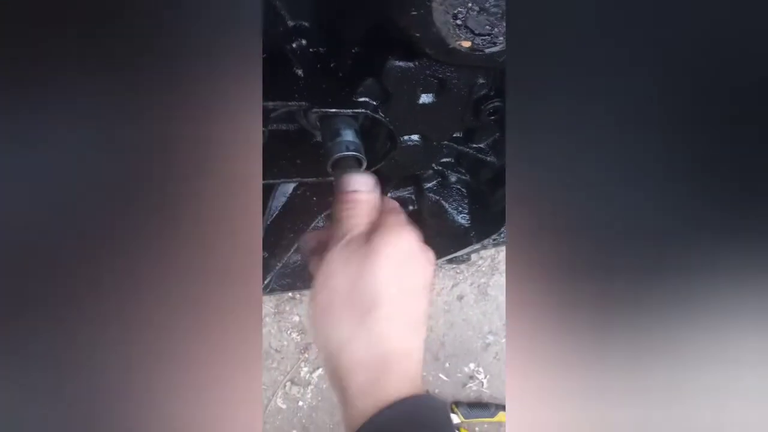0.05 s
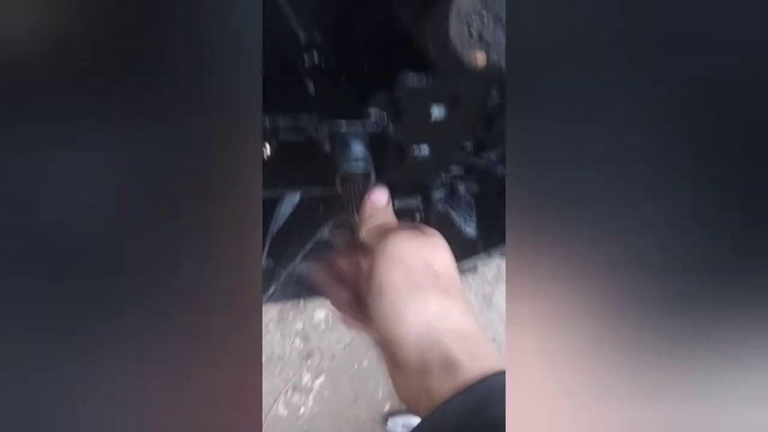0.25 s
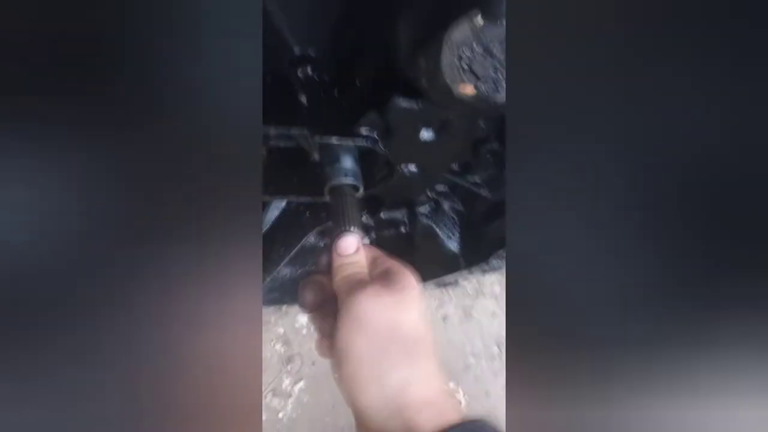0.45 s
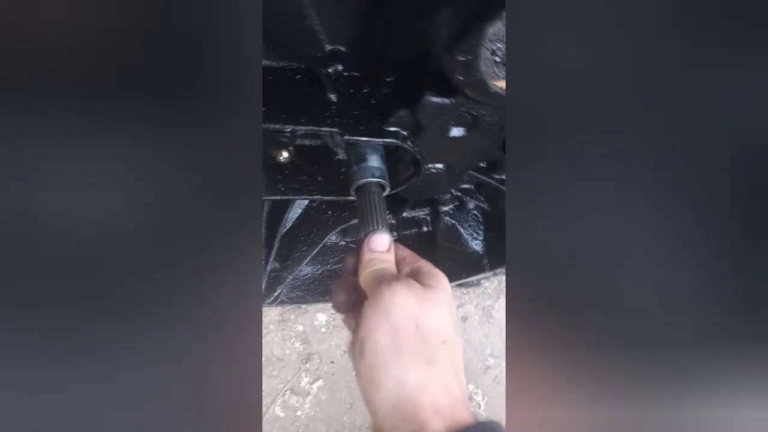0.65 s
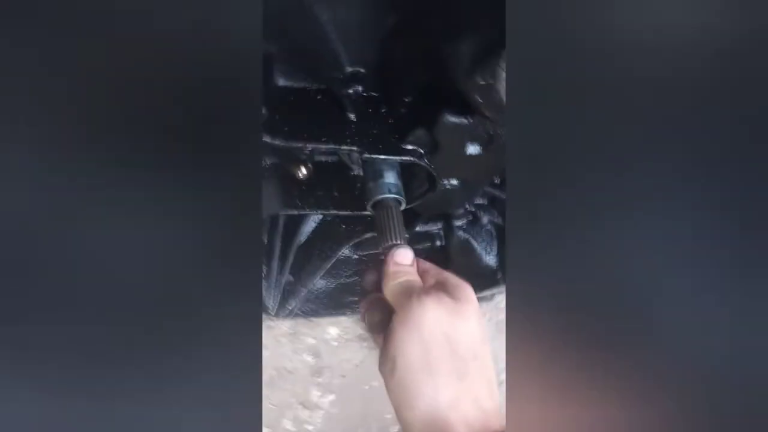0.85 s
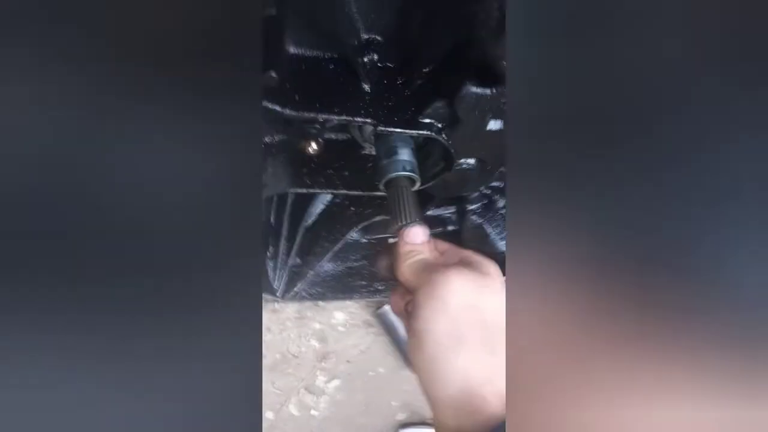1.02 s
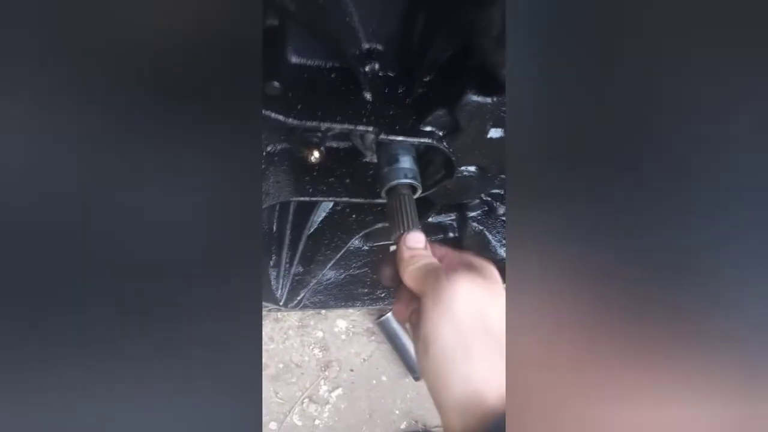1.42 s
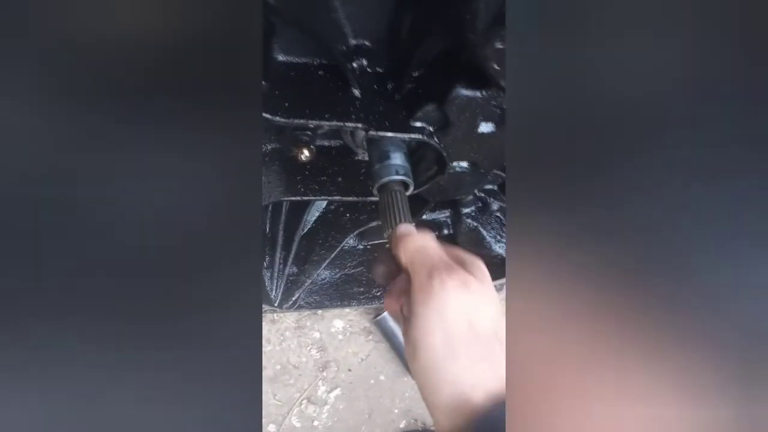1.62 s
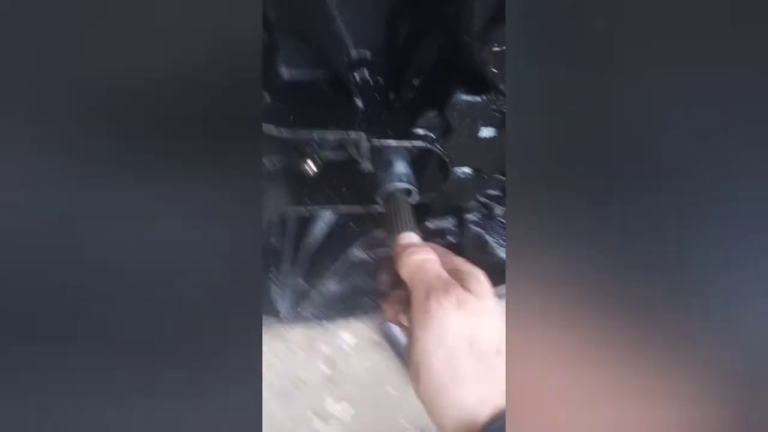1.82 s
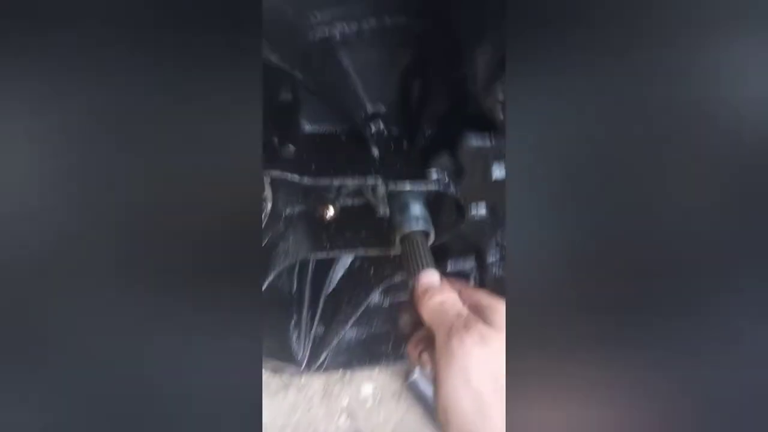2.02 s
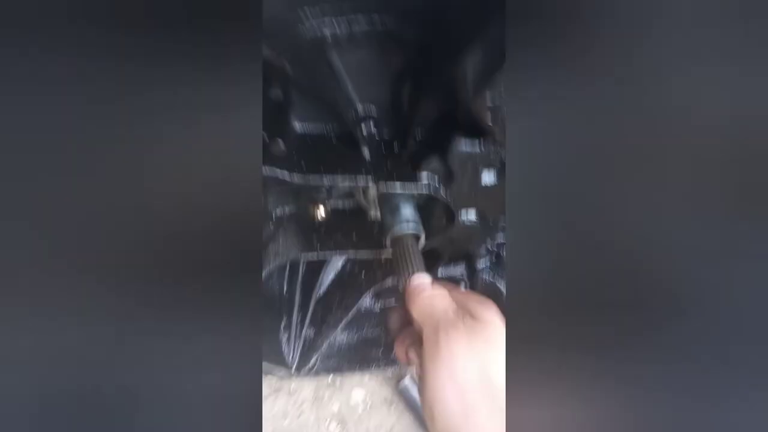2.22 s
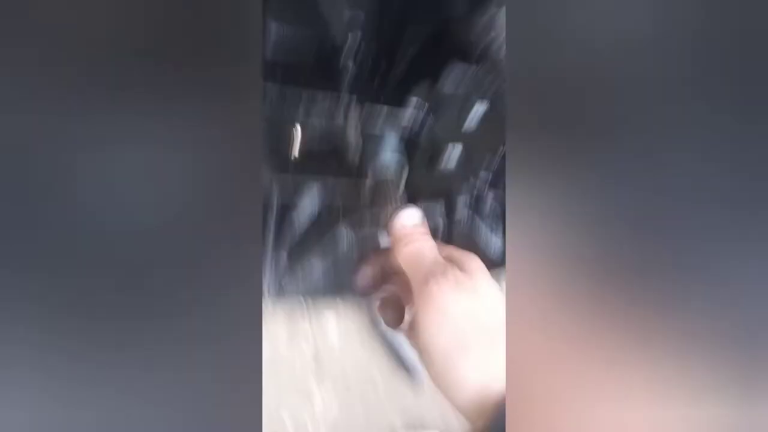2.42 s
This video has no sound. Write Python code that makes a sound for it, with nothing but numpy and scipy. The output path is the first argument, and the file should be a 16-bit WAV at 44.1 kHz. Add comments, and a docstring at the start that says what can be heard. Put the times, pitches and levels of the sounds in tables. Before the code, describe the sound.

A loose steel shaft rocked by hand, clunking and clicking repeatedly in its gearbox housing.

```python
"""A garage, up close: a hand rocks a loose steel shaft in its gearbox housing.
Each swing takes up the play with a light tap or two, touches, and lands a few ms later with a dull
clunk that rings the casting. The splines chatter with bright clicks that ring the shaft.
Underneath sit a low rumble, a faint hiss, the dull rub of the hand and a short room tail."""
import sys
import numpy as np
from scipy import signal
from scipy.fft import rfft, irfft
from scipy.io import wavfile

SR = 44100
rng = np.random.default_rng(int(sys.argv[2]) if len(sys.argv) > 2 else 0)


def log_audio(samples):
    """Write samples as a 16-bit WAV file to the path given in sys.argv[1]."""
    # one column per channel
    frames = np.atleast_2d(samples).T
    # limit to full scale, then quantise
    limited = np.clip(frames, -1, 1)
    pcm = np.round(limited * 32767).astype(np.int16)
    wavfile.write(sys.argv[1], SR, pcm)


N = 112454
HIT_SIZE = 6144  # samples in one hit
HIT_T, HIT_HZ = np.arange(HIT_SIZE) / SR, np.fft.rfftfreq(HIT_SIZE, 1 / SR)
RING_RISE_S = 0.0014
RING_ATTACK = 1 - np.exp(-HIT_T / RING_RISE_S)
TAP_DB, REBOUND_DB, CLICK_DB, CLUNK_DB = -3.5, -1.5, -8.5, -3.5  # faders, added to each hit's level


def amp(db):
    """Decibels to gain."""
    return 10 ** (np.asarray(db) / 20)


def unit(x):
    """Scales to energy 1."""
    return x / np.sqrt(np.sum(x ** 2) + 1e-20)


def read(points, hz):
    """Reads a curve on a log-frequency axis."""
    f, value = np.transpose(points)
    return np.interp(np.log(hz + 1), np.log(f), value)


def fader(curve):
    """A gain that rides a curve of seconds and dB."""
    return amp(np.interp(np.arange(N) / SR, *np.transpose(curve)))


def add(mix, s, sound):
    """Mixes a sound in at s seconds."""
    part = mix[max(round(s * SR), 0):][:len(sound)]
    part += sound[:len(part)]


def colour(x, db):
    """Minimum-phase EQ with a gain in dB for each bin of x."""
    cepstrum = irfft(np.log(amp(db)))
    cepstrum[1:len(x) // 2] *= 2
    cepstrum[len(x) // 2 + 1:] = 0
    return irfft(rfft(x) * np.exp(rfft(cepstrum)))


def shelves(hit, bass_db, treble_db, bass_hz=516, treble_hz=2450):
    """Bass and treble shelves for one hit."""
    bass = 1 / (1 + (HIT_HZ / bass_hz) ** 4)
    treble = 1 - 1 / (1 + (HIT_HZ / treble_hz) ** 4)
    return colour(hit, bass_db * bass + treble_db * treble)


def noise(eq):
    """Steady noise of rms 1, shaped by an EQ curve."""
    gain = amp(read(eq, np.fft.rfftfreq(N, 1 / SR)))
    return np.sqrt(N) * unit(irfft(rfft(rng.standard_normal(N)) * gain, N))


def dying_noise(t60, size):
    """Flat noise whose bands die away at their own speeds."""
    flat = irfft(np.exp(2j * np.pi * rng.random(size // 2 + 1)))
    hz, t, bands = signal.stft(flat, SR, nperseg=128)
    decay = amp(-60 * t / read(t60, hz)[:, None])
    return signal.istft(bands * decay, SR, nperseg=128)[1][:size]


# The rumble's EQ. Each row: frequency in Hz, gain in dB.
RUMBLE_EQ = [(20, -21.5), (50, -10), (68, -9), (95, 3), (150, 1.5), (210, -14), (400, -30), (16000, -65.5)]
# Its fader ride. Each row: time in seconds, level in dB.
RUMBLE_RIDE = [(0, -57.5), (1.35, -54), (1.6, -63), (2.23, -53), (2.36, -57), (2.55, -66.5)]

def rumble(hum_hz=95.7, hum_db=-15):
    """A low bed with a wavering hum inside it."""
    waver = noise([(3, 0), (12, -40), (40, -120)])
    hum = np.sqrt(2) * waver * np.sin(2 * np.pi * hum_hz * np.arange(N) / SR)
    return fader(RUMBLE_RIDE) * (noise(RUMBLE_EQ) + amp(hum_db) * hum)


# The hiss's EQ. Each row: frequency in Hz, gain in dB.
HISS_EQ = [(2500, -8), (6300, 13), (8200, -5), (10300, -2), (13000, -13.5), (15400, -4.5), (16200, -16)]
# Its fader ride. Each row: time in seconds, level in dB.
HISS_RIDE = [(0, -75), (.6, -78), (1.65, -88), (2.25, -71.5), (2.45, -72), (2.55, -79)]

def hiss():
    """Faint air on top."""
    return fader(HISS_RIDE) * noise(HISS_EQ)


# EQs for the hand's rub and the splines' scrape. Each row: frequency in Hz, gain in dB.
RUB_EQ = [(150, -1), (380, 21), (1100, 3), (3000, -9.5), (9000, -49)]
SCRAPE_EQ = [(2000, -35.5), (6400, 3.5), (8200, -8), (10300, 12.5), (12500, -6.5), (15000, 8), (16500, 0.5)]
# Their fader rides. Each row: time in seconds, level in dB.
RUB_RIDE = [(0, -54.5), (.17, -83.5), (1.1, -62.5), (1.6, -68.5), (2.2, -52.5), (2.36, -81)]
SCRAPE_RIDE = [(0, -75), (.08, -63), (.14, -67.5), (.19, -81), (.25, -75), (.32, -64), (.44, -77),
               (.6, -89)]

def handling(grain_db=3.5):
    """A faint, dull rub of the hand as it works the shaft; the splines scrape with the same grain."""
    grain = amp(grain_db * noise([(60, 0), (400, -25), (2000, -90)]))
    rub = fader(RUB_RIDE) * noise(RUB_EQ)
    scrape = fader(SCRAPE_RIDE) * noise(SCRAPE_EQ)
    return grain * (rub + scrape)


def creep(eq, swell_s=0.0044):
    """The faces scrape just before they meet: a tiny swell into the hit."""
    to_go = HIT_T[::-1]
    swell = np.exp(-to_go / swell_s) * (1 - np.exp(-2 * to_go / RING_RISE_S)) ** 2
    friction = colour(rng.standard_normal(HIT_SIZE), read(eq, HIT_HZ))
    return unit(swell * friction)[-HIT_SIZE // 8:]


# The casting's dense ring. Each row: frequency in Hz, seconds to fall 60 dB.
CASTING_DECAY = [(120, 0.097), (400, 0.049), (2000, 0.064), (15000, 0.06)]

def strike(eq, modes, ring_db, modes_db, contact_s, grit, push_s=0.00005):
    """Metal on metal: a clean push, grit as the faces grind, then a dense ring and clear modes."""
    shape = read(eq, HIT_HZ)
    push = unit(colour(np.exp(-HIT_T / push_s), shape))
    grind = unit(colour(rng.standard_normal(HIT_SIZE) * HIT_T * np.exp(-HIT_T / contact_s), shape))
    dense = unit(colour(RING_ATTACK * dying_noise(CASTING_DECAY, HIT_SIZE), shape))
    clear = np.zeros(HIT_SIZE)
    for hz, db, t60 in modes:
        vary_db, detune_hz, phase = rng.standard_normal(3) * (2.4, 6, 1.09)
        decay = amp(db + vary_db - 60 * HIT_T / t60)
        clear += decay * np.cos(2 * np.pi * (hz + detune_hz) * HIT_T + phase)
    return unit(push + grit * grind) + amp(ring_db) * dense + amp(modes_db) * unit(RING_ATTACK * clear)


# The housing's modes. Each row: pitch in Hz, level in dB, seconds to fall 60 dB.
HOUSING_MODES = [(347, 1.5, 0.02), (472, -3.5, 0.1), (584, -10, 0.16), (708, 2.5, 0.039), (786, 2.5, 0.08),
                 (984, 0, 0.065), (1120, -2.5, 0.07), (1484, -6, 0.055), (1675, -11, 0.06),
                 (1895, -8, 0.04), (2835, -8, 0.04), (4540, -14, 0.058)]
# A tap's boxy EQ. Each row: frequency in Hz, gain in dB.
TAP_EQ = [(40, -39), (170, -4.5), (470, 6), (650, 0), (1130, 2.5), (1340, -10), (2000, -6.5), (2500, -14.5),
          (6600, -27), (8500, -41.5), (14000, -58.5)]

def tap(db, bass_db, treble_db):
    """One light, gritty knock on the housing."""
    hit = strike(TAP_EQ, HOUSING_MODES, ring_db=-4, modes_db=-5, contact_s=0.0017, grit=2.6)
    return amp(TAP_DB + db) * shelves(hit, bass_db, treble_db)


# The light taps. Each row: start in seconds, level in dB, bass in dB, treble in dB.
TAP_CUES = [(0.042, -18, 10, 12), (.364, -13.5, -3, -12), (.519, -14.5, 5.5, -17), (0.532, -14, 9, 3.5),
            (0.5552, -5.5, 2.5, -9), (.573, -12.5, -7, -12), (.924, -4, -10.5, -29), (0.9441, -5.5, 0, -12),
            (1.106, -13.5, 2.5, -13), (1.127, -7.5, -4.5, 1.5), (1.290, -18, 6.5, -31),
            (1.3155, -10, -1.5, -1.5), (1.4961, -13, -1, -6.5), (1.7033, -14, 0, -7.5),
            (1.874, -21.5, 13.5, -16), (1.897, -13.5, 0.5, 5.5), (2.043, -22, 19, 4.5),
            (2.0663, -7, -10, 2.5), (2.215, -27, 19.5, -7), (2.234, -5, -9, -0.5)]

def taps(creep_db=-18.5):
    """The shaft takes up the play, scraping into each tap."""
    out = np.zeros(N)
    for s, db, bass_db, treble_db in TAP_CUES:
        scrape = creep(TAP_EQ)
        add(out, s - len(scrape) / SR, amp(TAP_DB + db + creep_db) * scrape)
        add(out, s, tap(db, bass_db, treble_db))
    return out


# A firm knock's dark EQ. Each row: frequency in Hz, gain in dB.
KNOCK_EQ = [(40, -30.5), (110, -24), (190, 0), (300, -0.5), (480, 2.5), (625, 1.5), (760, 3.5), (900, -7),
            (1000, 2.5), (1150, -12), (1320, -17.5), (1480, -4.5), (1600, -23.5), (1950, -10.5),
            (2450, -18.5), (6500, -25), (8200, -35), (10000, -41), (16000, -47)]

def knock(modes_db):
    """One short, firm contact with the housing, more push than grit."""
    return strike(KNOCK_EQ, HOUSING_MODES, ring_db=-3, modes_db=modes_db, contact_s=0.00052, grit=0.58)


# The bounces. Each row: start in seconds, level in dB, bass in dB, treble in dB.
REBOUND_CUES = [(0.2323, -7.5, -23, -10), (0.237, -2.5, -24, -13), (0.2421, -16, 8, -8.5),
                (0.2528, -9.5, -8, -9.5), (.379, -14.5, -8.5, -2.5), (0.3847, -14, 7.5, 14),
                (0.414, -17, 10, 0.5), (0.7304, -5, -18.5, -8), (0.8191, -4.5, -2, -11),
                (0.9941, -12, 0, 1), (1.743, -15.5, -0.5, 8), (2.121, -10, 1, -7.5)]

def rebounds():
    """The shaft strikes again or bounces in the housing."""
    out = np.zeros(N)
    for s, db, bass_db, treble_db in REBOUND_CUES:
        add(out, s, amp(REBOUND_DB + db) * shelves(knock(modes_db=-1), bass_db, treble_db))
    return out


# The shaft's modes. Each row: pitch in Hz, level in dB, seconds to fall 60 dB.
SHAFT_MODES = [(5260, -1.5, 0.072), (5650, -0.5, 0.04), (6050, 0, .055), (6400, -1, .07), (6680, -1, 0.045),
               (9300, -6.5, .04), (14910, 0, .07)]
# A click's bright EQ. Each row: frequency in Hz, gain in dB.
CLICK_EQ = [(300, -52.5), (1500, -15), (3600, -18), (5200, -6), (6400, 4.5), (7100, -4), (8200, -13),
            (9700, -4), (13000, -15.5), (15100, -2), (16200, -10)]
# The spline chatter. Each row: start in seconds, level in dB, top octave in dB.
CLICK_CUES = [(.234, -8, 7), (0.2408, -17.5, 18.5), (0.3764, -8.5, -7), (0.3844, -3.5, 12),
              (0.529, -19.5, 0), (.539, -24.5, 13.5), (0.59, -17, -1.5), (.685, -30, 4), (0.694, -48, 25),
              (0.709, -25, 2), (0.723, 8.5, -30), (.728, 2, -23), (0.811, -8, -23), (0.822, -10.5, -25),
              (0.835, -33, -17), (0.896, -51, 34), (.924, -10.5, -15), (.972, -25, -8), (.983, -9.5, -8),
              (0.995, -11, -20), (1.107, -16, -10), (1.150, -34, 17), (1.164, -22.5, 6), (1.256, -51, 32.5),
              (1.276, -26.5, 3), (1.29, -23.5, -1), (1.347, -14.5, -2.5), (1.455, -21.5, 8.5),
              (1.475, -25.5, -8.5), (1.541, -7.5, -1), (1.551, -21, -2), (1.7328, -13, 7.5),
              (1.739, -3.5, 2), (1.860, -20.5, 3), (1.875, -23, -5), (1.9325, 0.5, -6), (1.9396, -1, -8.5),
              (1.949, -14.5, -1), (2.043, -13.5, -24), (2.0657, -22, -26), (2.113, -3.5, -4),
              (2.1173, 1.5, -6.5), (2.133, -9.5, -5), (2.215, -18.5, -12), (2.275, -3, -9.5)]

def spline_clicks(creep_db=-25.5, skid_db=-30.5):
    """Hard steel edges scrape, click, skid on and ring the shaft."""
    out = np.zeros(N)
    for s, db, top_db in CLICK_CUES:
        scrape = creep(CLICK_EQ)
        hit = strike(CLICK_EQ, SHAFT_MODES, ring_db=-5.5, modes_db=-12, contact_s=0.0013, grit=3.6)
        add(out, s - len(scrape) / SR, amp(CLICK_DB + db + creep_db) * scrape)
        add(out, s, amp(CLICK_DB + db) * shelves(hit, 0, top_db, treble_hz=8780))
        add(out, s, amp(skid_db + db / 2) * skid())  # light contacts skid most for their size
    return out


def skid(slips_per_s=330, fade_s=0.0031):
    """A dying scatter of tiny slips between steel edges."""
    slips = rng.standard_normal(HIT_SIZE) * (rng.random(HIT_SIZE) < slips_per_s / SR)
    return unit(colour(slips * np.exp(-HIT_T / fade_s), read(CLICK_EQ, HIT_HZ)))


# The landings. Each row: start in seconds, level in dB, bass in dB, clack in dB, treble in dB,
# top ring in dB, the first touch's lead in seconds, its level against the landing in dB.
CLUNK_CUES = [(0.588, -0.5, -0.5, -2, -6, -48, 0.005, -4.5), (0.7239, 6, -6, -8.5, -8, -33, 0.0019, -20),
              (0.8112, -1.5, 2.5, 2, -1, -28, 0.0075, -12.5), (0.9831, -2, 2, 3, -10, -28, 0.0046, -3.5),
              (1.166, 2, -3.5, 5, -6.5, -46, 0.0067, -9.5), (1.3488, -1.5, 2.5, 2, -2.5, -37, 0.0041, -3),
              (1.5397, -1.5, 0, 6.5, -7, -34, 0.0016, -6), (1.736, -0.5, -1, 5.5, 0, -28, 0.002887, -4),
              (1.9319, -2, 2, -1, -3, -39.5, 0.006, -2.5), (2.1138, 2, 0, 1, -1.5, -44, 0.0055, -10.5),
              (2.2768, -3.5, 7.5, -19.5, 1.5, -31.5, 0.0014, -1)]

def clunks(clack_hz=467, clack_width_hz=85):
    """The shaft touches, then lands; the squarer the landing, the more the housing clacks."""
    out = np.zeros(N)
    clack_band = 1 / (1 + ((HIT_HZ - clack_hz) / clack_width_hz) ** 2)
    for s, db, bass_db, clack_db, treble_db, ring_db, lead_s, touch_db in CLUNK_CUES:
        hit = colour(knock(modes_db=-3), clack_db * clack_band)
        add(out, s, amp(CLUNK_DB + db) * shelves(hit, bass_db, treble_db))
        add(out, s, amp(ring_db) * top_ring())
        add(out, s - lead_s, tap(db + touch_db, bass_db=4.5, treble_db=4.5))
    return out


def top_ring(spread_hz=55):
    """A thin shimmer: the shaft's top mode splits into four close ones that beat."""
    hz, _, t60 = SHAFT_MODES[-1]
    cluster = sum(np.sin(2 * np.pi * ((hz + spread_hz * detune) * HIT_T + phase))
                  for detune, phase in rng.standard_normal((4, 2)))
    return unit(RING_ATTACK * amp(-60 * HIT_T / t60) * cluster)


# The reverb's EQ. Each row: frequency in Hz, gain in dB.
GARAGE_EQ = [(100, -15.5), (400, -26.5), (1000, -20), (9000, -25), (16000, -22.5)]
# Its decay. Each row: frequency in Hz, seconds to fall 60 dB.
GARAGE_DECAY = [(100, 0.29), (400, 0.17), (6500, 0.17), (15000, 0.084)]

def garage(x, size=32768, build_s=0.016):
    """The room answers with a short, quiet, diffuse tail."""
    attack = 1 - np.exp(-np.arange(size) / SR / build_s)
    tail = unit(dying_noise(GARAGE_DECAY, size) * attack)
    response = colour(tail, read(GARAGE_EQ, np.fft.rfftfreq(size, 1 / SR)))
    return signal.fftconvolve(x, response)[:N]


# Stereo width. Each row: frequency in Hz, side level against the centre in dB.
WIDTH = [(2500, -75.5), (5000, -34), (10000, -23)]

def scene():
    """Everything sits centre; a faint, phase-shifted difference between the channels rises in the treble."""
    # The metal sounds lose their deep bass below about 70 Hz.
    low_cut = signal.butter(2, 70, "highpass", fs=SR, output="sos")
    metal = signal.sosfilt(low_cut, clunks() + rebounds() + taps() + spline_clicks())
    mid = metal + garage(metal) + rumble() + hiss() + handling()
    side = irfft(1j * rfft(mid) * amp(read(WIDTH, np.fft.rfftfreq(N, 1 / SR))), N)
    return np.array([mid + side, mid - side])


def record(dry, cutoff_hz=16100):
    """A steep high cut on the whole mix."""
    high_cut = signal.firwin(255, cutoff_hz, window=("kaiser", 9), fs=SR)
    return signal.oaconvolve(dry, high_cut[None], "same")


dry = scene()
out = record(dry)
log_audio(out)
```